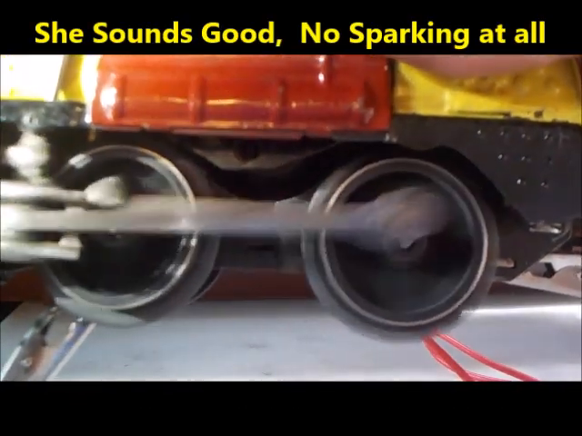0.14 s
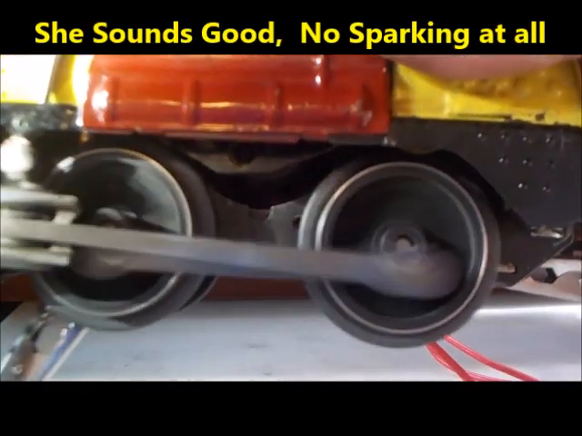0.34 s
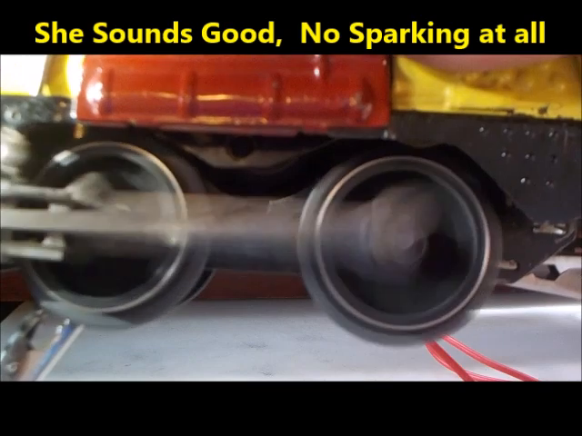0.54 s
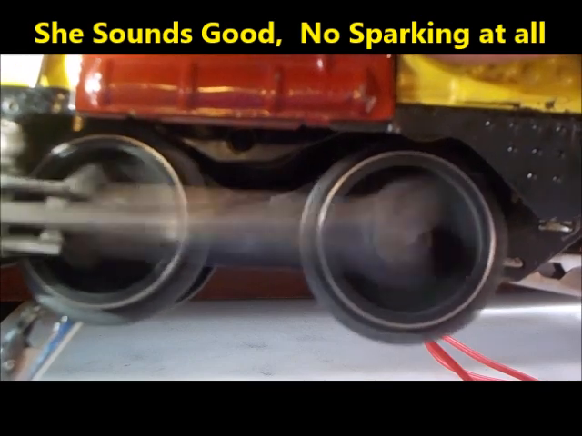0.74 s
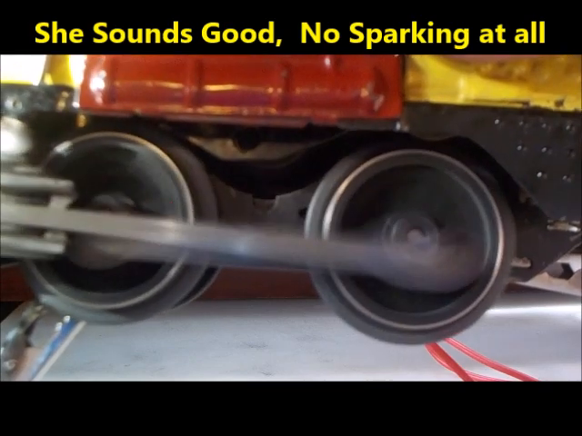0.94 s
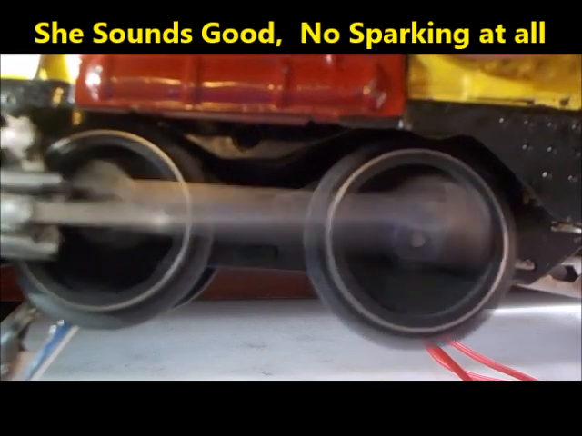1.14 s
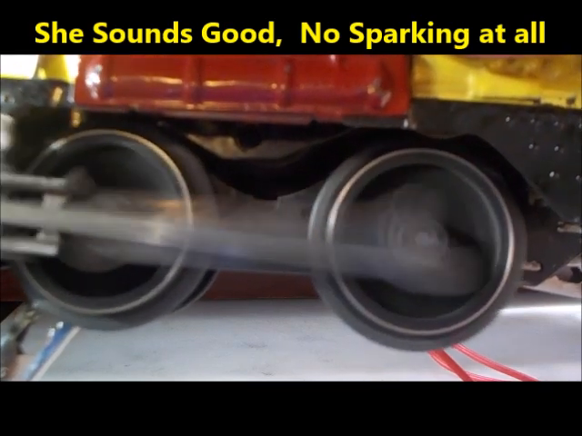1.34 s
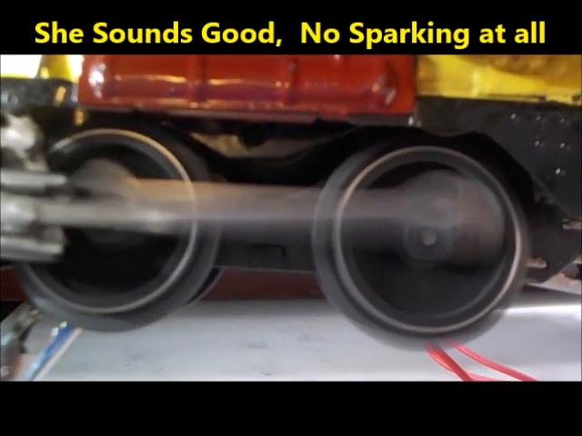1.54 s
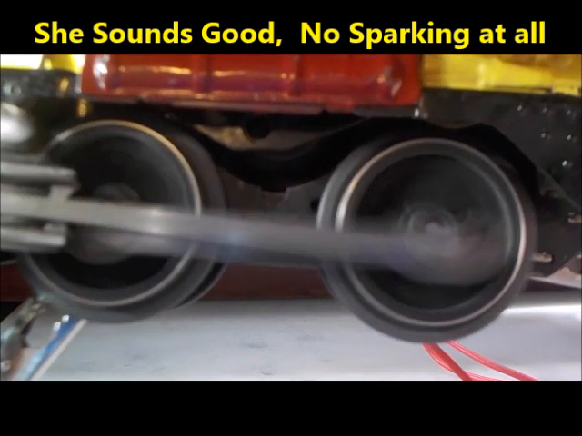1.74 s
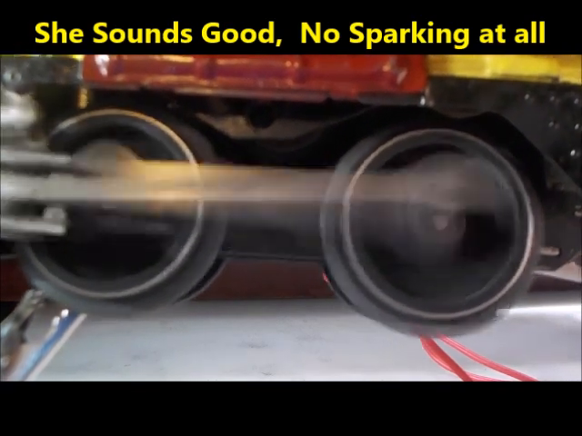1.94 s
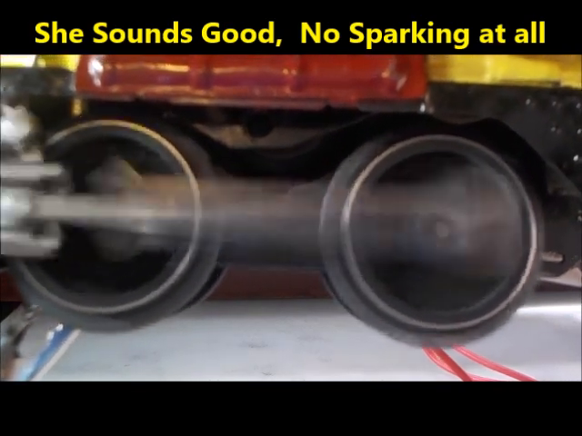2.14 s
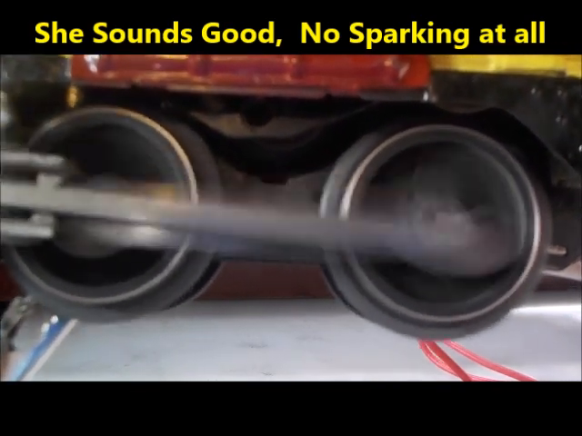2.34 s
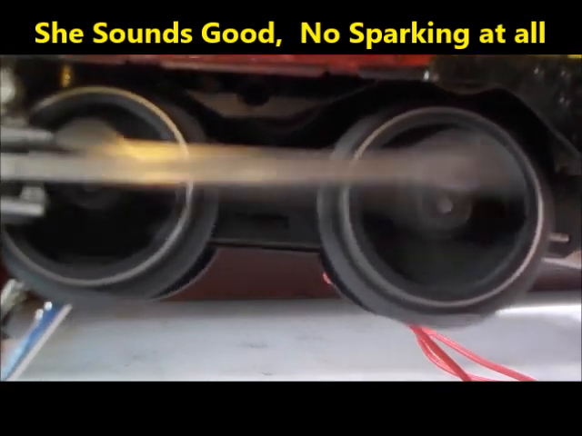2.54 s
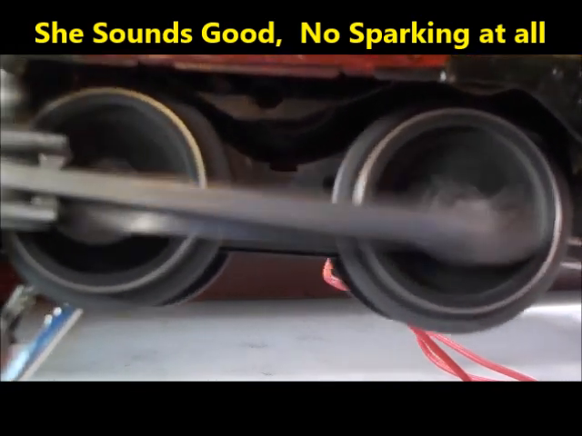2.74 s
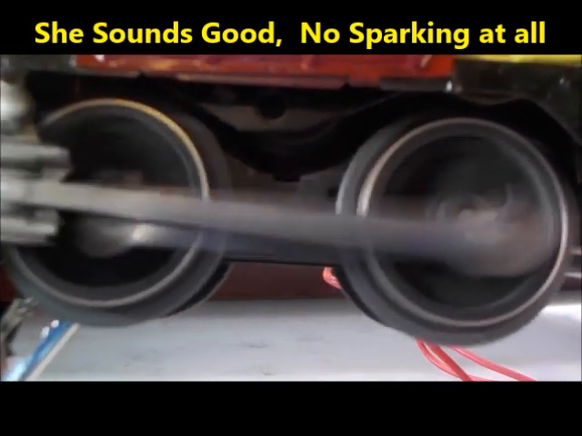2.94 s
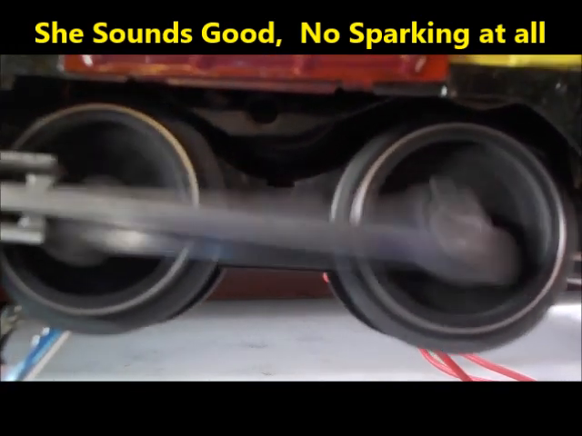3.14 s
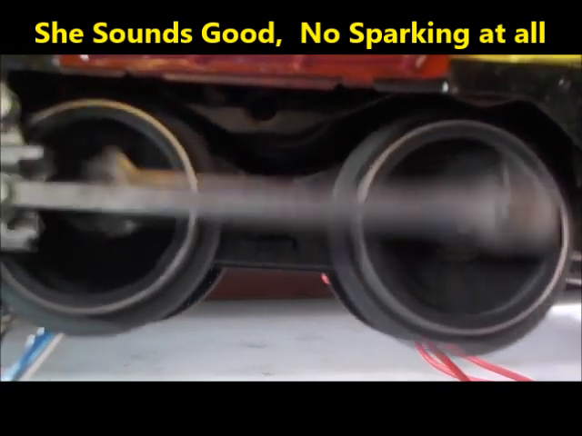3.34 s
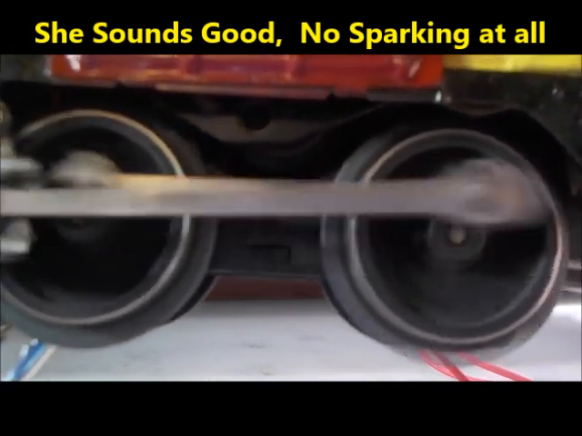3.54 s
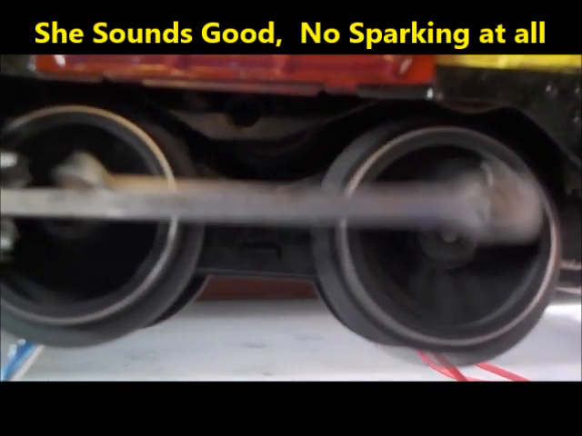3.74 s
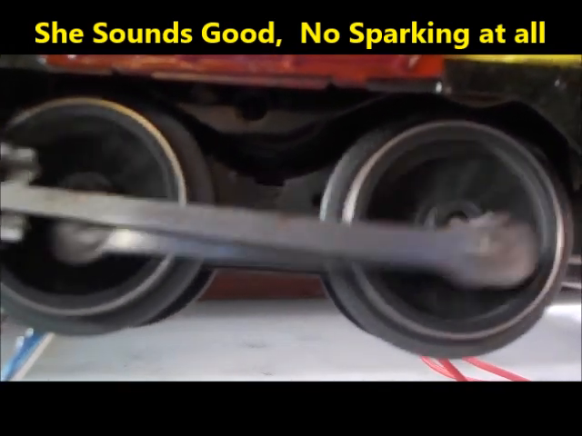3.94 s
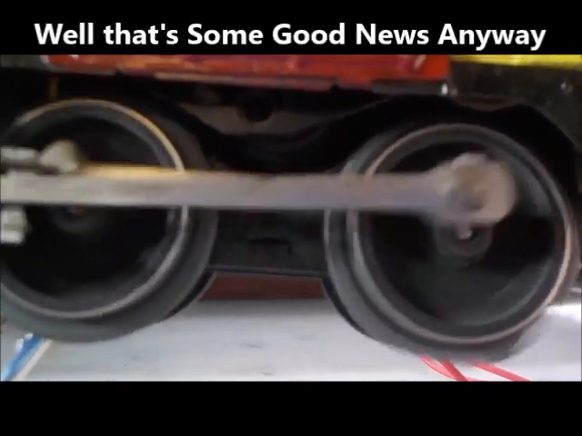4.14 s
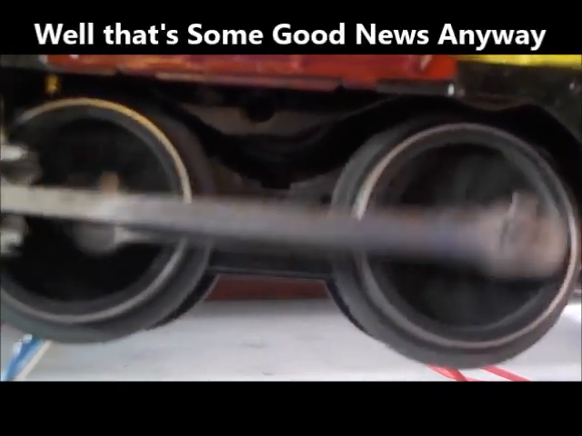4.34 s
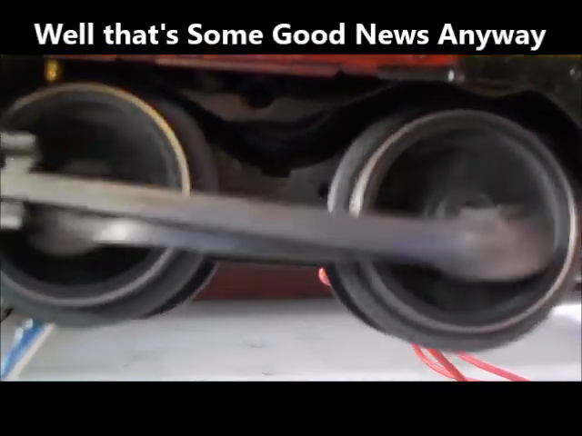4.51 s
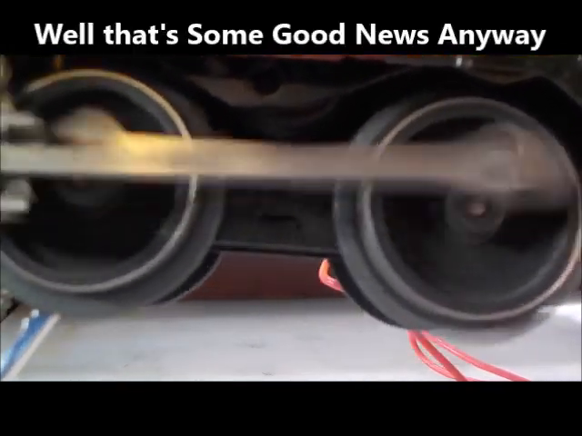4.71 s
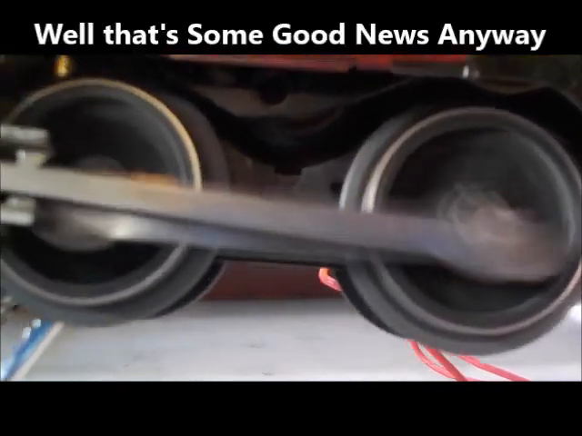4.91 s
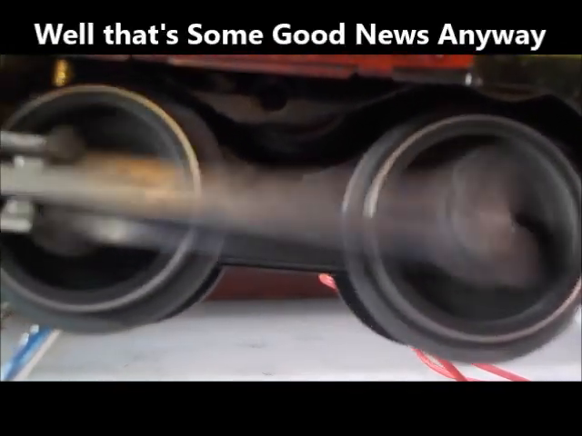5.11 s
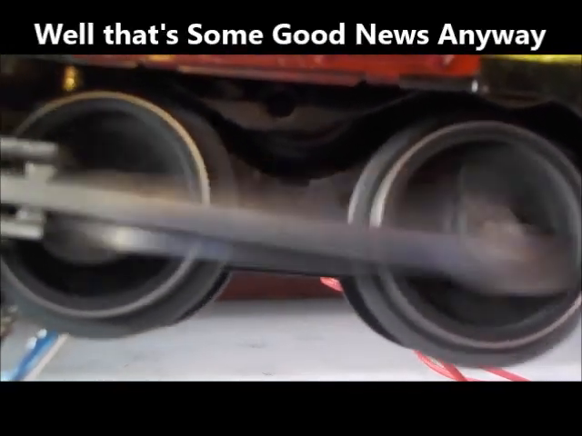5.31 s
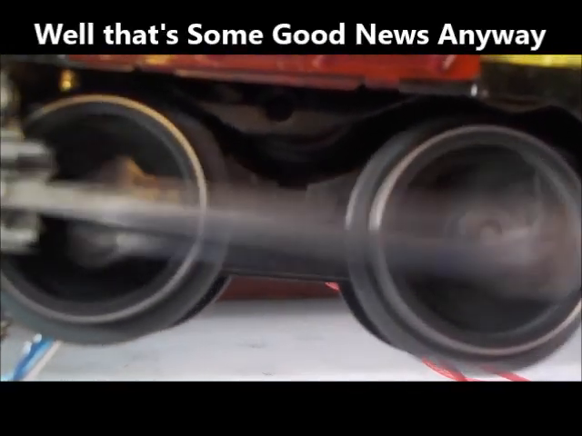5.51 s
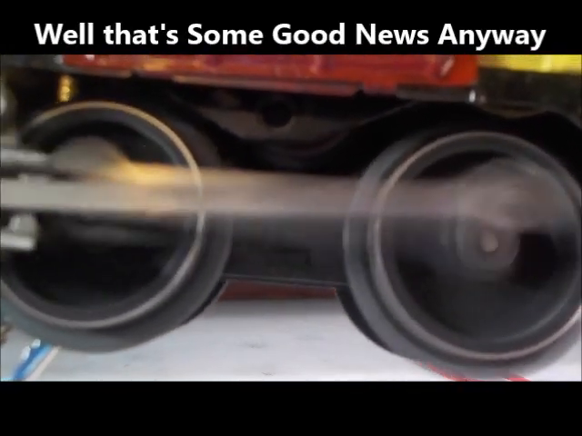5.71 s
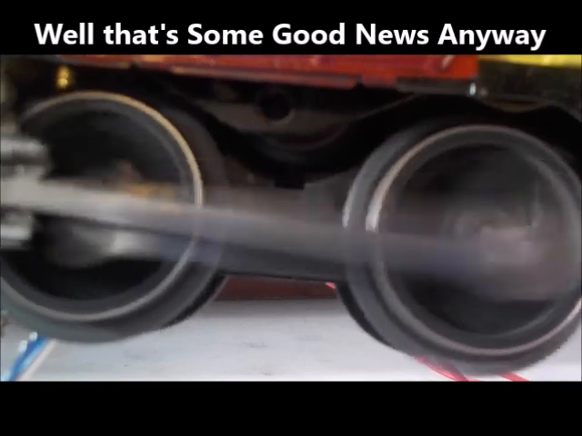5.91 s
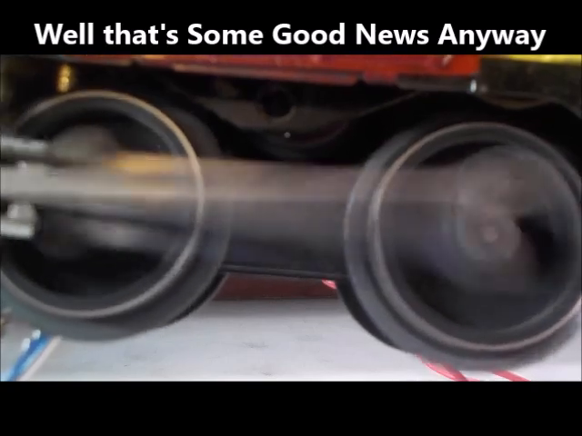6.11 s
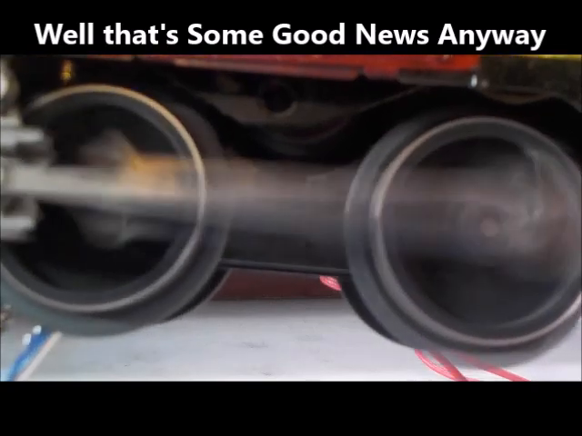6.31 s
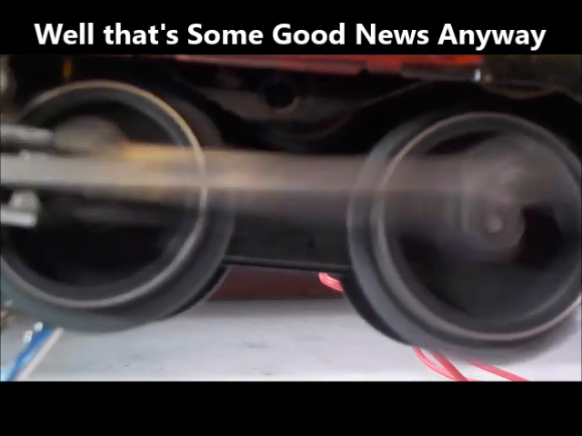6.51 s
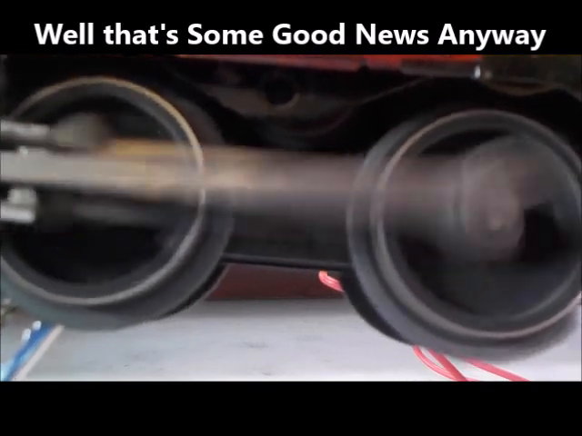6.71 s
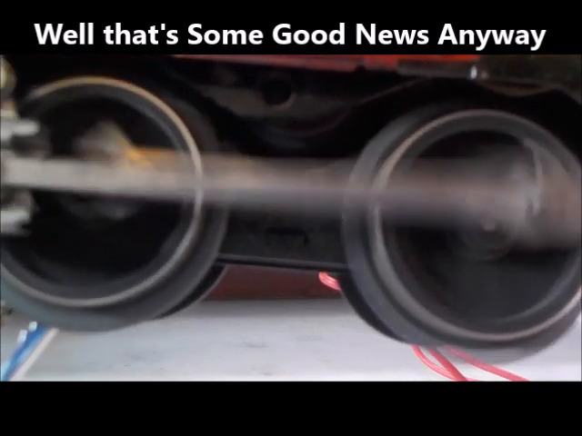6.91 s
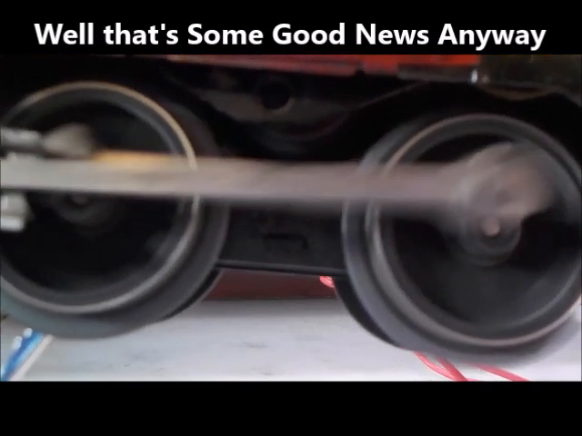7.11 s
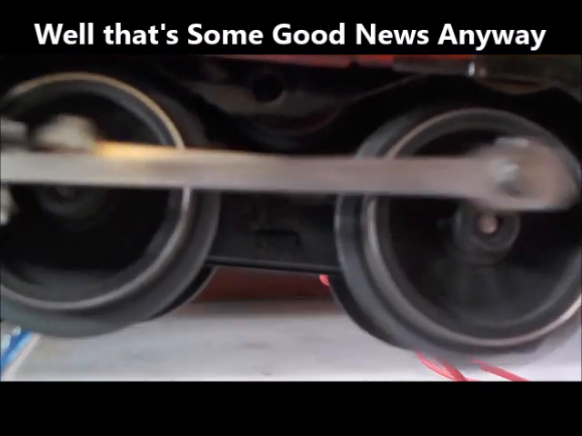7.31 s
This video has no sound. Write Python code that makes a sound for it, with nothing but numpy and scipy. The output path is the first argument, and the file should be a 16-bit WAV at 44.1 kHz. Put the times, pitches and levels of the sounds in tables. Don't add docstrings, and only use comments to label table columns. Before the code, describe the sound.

A small electric model locomotive runs wheels-free on a bench, picked up very close and dry in stereo, with little bass. It begins fairly quiet, its gritty gear chatter and separate rod clacks quickening over the first second into a loud, bright metallic whir. From about 1 to 2.6 seconds it races: side rods knock and clack about a dozen times a second, unevenly, over dense tooth chatter, a faint armature hum and thin rim ringing, with brittle overload cracks. From 2.6 it coasts down, the clacks spreading apart, until around 4.1 only a faint slow rattle remains. Power returns at about 4.3, and the whir climbs to full loudness by 5.5, again harsh and crackling until about 6.4. It then eases off, slack rods still clacking hard, slowing and quieter but still turning at the end, about 7.4 seconds.

```python
import sys
import numpy as np
from scipy import signal
from scipy.fft import rfft, irfft, next_fast_len
from scipy.io import wavfile
from scipy.ndimage import uniform_filter1d

SR = 44100
rng = np.random.default_rng(int(sys.argv[2]) if len(sys.argv) > 2 else 0)


def int16_out(signal):
    q = np.round(np.clip(np.atleast_2d(signal).T, -1, 1) * 32767)
    wavfile.write(sys.argv[1], SR, q.astype(np.int16))


def how_loud(loudness_db):
    steps = np.asarray(loudness_db, float) / 20
    return 10 ** steps


N = 324568
FULL_SPEED = 114
GEAR_RATIO, START_WHEEL_TURN = 8.5477, -1.488


def rms_one(x):
    return x / np.sqrt(np.mean(x ** 2) + 1e-20)


def in_time(rows):
    s, *columns = np.transpose(rows)
    return [np.interp(np.arange(N) / SR, s, c) for c in columns]


def at_hz(points, hz):
    table_hz, level_db = np.array(points)[:, 0], np.array(points)[:, 1]
    return np.interp(np.log(hz + 1), np.log(table_hz), level_db)


def colour(x, spectrum):
    closed = [(spectrum[0][0] / 2, -90)] + list(spectrum) + [(spectrum[-1][0] * 1.15, -90)]
    cepstrum = irfft(at_hz(closed, np.linspace(0, SR / 2, 2049)) * np.log(10) / 20)
    cepstrum[1:2048] *= 2
    cepstrum[2049:] = 0
    return signal.fftconvolve(x, irfft(np.exp(rfft(cepstrum))))[:N]


def band(x, order, hz, kind):
    return signal.sosfilt(signal.butter(order, hz, kind, fs=SR, output="sos"), x)


def drift(rate):
    r = np.exp(-2 * np.pi * rate / SR)
    return rms_one(signal.lfilter([1], [1, -2 * r, r * r], rng.standard_normal(N + SR))[SR:])


def ring(clicks, hz, t60):
    r, w = how_loud(-60 / (t60 * SR)), 2 * np.pi * hz / SR
    return signal.lfilter([0, np.sin(w)], [1, -2 * r * np.cos(w), r * r], clicks + 1e-18)


def strikes(seconds, heights):
    train = np.zeros(N)
    train[np.minimum(np.round(np.asarray(seconds) * SR).astype(int), N - 1)] = heights
    return train


def spread(excitation, spectrum, width):
    lean = width * drift(500)
    return rms_one(np.array([colour(excitation * (1 + side * lean), spectrum) for side in (1, -1)]))


# start_s, speed_turns_per_s
MOTOR_SPEED = [(0.0, 41.5), (0.57, 81.9), (0.913, 97.4), (1.287, 106.8), (1.715, 111.1), (2.329, 114.7),
               (2.564, 112.3), (3.13, 70.6), (3.617, 41.8), (3.946, 27.2), (4.138, 18.6), (4.42, 34.6),
               (4.577, 55.5), (5.442, 97.1), (5.814, 108.5), (6.308, 110.8), (6.753, 79.5), (7.36, 38.3)]


def motor_run():
    speed, = in_time(MOTOR_SPEED)
    start_turn = .114
    return speed, start_turn + np.cumsum(speed) / SR


def push(speed):
    return uniform_filter1d(np.gradient(np.log(speed)) * SR, size=SR // 5, mode="nearest")


# start_s, level_db
CHATTER = [(0, -35), (.45, -29.5), (.9, -25), (1.99, -24), (2.6, -24), (3.26, -30.5), (3.92, -40),
           (4.2, -43.5), (4.45, -33.5), (4.67, -29.5), (5.45, -24), (6.13, -24), (6.72, -26.5), (7.2, -35),
           (7.36, -37.5)]


def chatter_level():
    return in_time(CHATTER)[0]


def crank(contacts, speed, turns):
    angle, db, octave_db, loss_db, scatter = np.transpose(contacts)
    wheel = turns / GEAR_RATIO + START_WHEEL_TURN
    luck = rng.standard_normal((2, 70, len(contacts)))
    contact_turns = np.arange(-2, 68)[:, None] + angle + scatter * luck[0]
    at = np.interp(contact_turns, wheel, np.arange(N)).astype(int)
    level_db = chatter_level()[at] + db + octave_db * np.log2(speed[at] / FULL_SPEED)
    level_db -= loss_db * np.abs(luck[1])
    level_db -= 0.5 * np.minimum(push(speed)[at], 0)
    inside = (at > 0) & (at < N - 99)
    return at[inside] / SR, level_db[inside]


SEGMENTS = [
    0,
    -9,
    -7,
]


def brushes(turns):
    gap = np.floor(3 * turns).astype(int)
    crossed = np.diff(gap, prepend=gap[0]) > 0
    tick_db = np.array(SEGMENTS)[gap % 3] + rng.normal(0, 0.47, N)
    return rms_one(crossed * how_loud(tick_db) * rng.choice([-1, 1], N))


def teeth(per_s, spread_db, low_hz, high_hz, cycles, dry_db):
    sizes = how_loud(spread_db * np.minimum(rng.exponential(1, N), 3.3)) * rng.choice([-1, 1], N)
    clicks = sizes * (rng.random(N) < per_s / SR) / np.sqrt(per_s)
    dealt = rng.integers(0, 12, N)
    rings = 0
    for k, hz in enumerate(np.geomspace(low_hz, high_hz, 12)):
        rings = rings + rms_one(ring(clicks * (dealt == k), hz, cycles / hz)) * np.sqrt(hz)
    return rms_one(rings) + how_loud(dry_db) * rms_one(clicks)


# crank_angle_turns, hardest_db (against the whir),
# change_db (per doubling of speed), usual_loss_db, scatter_turns
KNOCKS = [
    (-.016, 3, -2.2, 4, .004),
    (.195, -2, 1.2, 4, .012),
    (.3, -3, -2.5, 4, .015),
]
# pitch_hz, level_db (per Hz)
RUMBLE = [(59, -71), (100, -52.5), (327, -35), (373, -40.5), (513, -28), (661, -13), (885, -3.5),
          (1110, -9.5), (1170, -5.5), (1320, -3.5), (1450, -4.5), (1630, -0.5), (1840, -9), (2100, -5.5),
          (2400, -18), (3120, -49), (5280, -120)]
# pitch_hz, level_db (per Hz)
WHIR = [(1410, -104), (2400, -40), (2720, -23.5), (3010, -24.5), (3360, -3.5), (3570, -1.5), (3930, -2),
        (4420, -5.5), (5940, -7.5), (6510, -13), (7160, -28.5), (8000, -45.5), (10400, -27), (17600, -120)]
# pitch_hz, level_db (per Hz)
FIZZ = [(4710, -30), (8000, -7.5), (8320, -6.5), (8600, -8.5), (9620, -8.5), (12500, -15), (16200, -75),
        (22000, -120)]


def gears(speed, turns):
    knock_s, _ = crank(KNOCKS[:1], speed, turns)
    fade = np.exp(-1 / (0.006 * SR))
    shaken_db = 3.0 * signal.lfilter([1], [1, -fade], strikes(knock_s, 0.64))
    beat_db = 0.86 * np.cos(2 * np.pi * turns) + 0.75 * drift(67) + 1.38 * drift(26.6)
    wheel = turns / GEAR_RATIO + START_WHEEL_TURN
    load_db = 0.5 * np.cos(2 * np.pi * (wheel - 0.25))

    octaves = np.log2(speed / FULL_SPEED)
    rumble_db = -19.5 + 1.3 * push(speed) - 0.8 * octaves
    fizz_db = -27.5 + 1.1 * octaves

    ticks = brushes(turns) * (50 / speed) ** .9
    bright = teeth(36 * speed + 900, 3.2, 2700, 7250, cycles=33.4, dry_db=0.5)
    bright = rms_one(bright) + .62 * ticks
    dull = teeth(16 * speed + 300, 1.0, 371, 2227, cycles=14.3, dry_db=-24) + 0.76 * bright
    fine = teeth(40 * speed + 900, 1.5, 9250, 8600, cycles=21, dry_db=-1) + 0.37 * bright
    fine = rms_one(fine) + 1.6 * ticks

    dull = dull * how_loud(0.74 * beat_db + shaken_db + load_db)
    fine = fine * how_loud(1.67 * beat_db + shaken_db)
    dull = dull + how_loud(-36) * ring(dull, 1483, .03)
    whir = spread(bright * how_loud(beat_db + shaken_db), WHIR, width=.2)
    rumble = spread(dull, RUMBLE, width=0.11)
    fizz = spread(fine, FIZZ, width=1.0)
    layers = whir + how_loud(rumble_db + 2.5) * rumble + how_loud(fizz_db + 5.0) * fizz
    return how_loud(chatter_level() + 0.54) * layers


# multiple_of_speed, level_db (at full speed)
HUM = [
    (3, -54),
    (4, -60),
    (6, -58.5),
    (9, -61),
    (12, -60),
]
# pitch_hz, level_db
BENCH_TOP = [(170, -46), (250, -30), (350, -29), (510, -18), (590, 0), (800, 0), (1030, 1), (1350, -14)]


def armature(speed, turns):
    coast_s = 1.0
    drive = np.clip(speed * (1 + coast_s * push(speed)) / FULL_SPEED, .01, 1)
    current_db = 20 * np.log10(drive) + 11 * np.minimum(np.log2(speed / 90), 0)
    hum = np.zeros(N)
    for k, db in HUM:
        line_db = db + at_hz(BENCH_TOP, k * speed) + current_db + 27 / k ** 2 * drift(5)
        hum += np.sqrt(2) * how_loud(line_db) * np.sin(2 * np.pi * k * turns)
    return hum


def room_tone():
    mid, side = rng.standard_normal((2, N))
    noise = np.array([mid + 0.12 * side, mid - 1.1 * side])
    hiss = band(noise, 2, 10500, "high") * how_loud(2.2 * drift(25))
    rumble = band(noise, 4, [430, 1100], "band") * how_loud(2 * drift(8))
    deep = band(noise, 3, [130, 330], "band")
    hum = band(mid, 2, [30, 48], "band")
    return how_loud(-66.5) * hiss + how_loud(-52.5) * rumble + how_loud(-73.0) * deep + how_loud(-81) * hum


# pitch_hz, level_db, fade_s (to fall 60 dB)
FRAME = [
    (1483, 0, .055),
    (1605, -5, .04),
    (1190, -8, .04),
    (935, -13, .04),
]


def rod_knocks(speed, turns):
    s, db = crank(KNOCKS, speed, turns)
    luck_db = rng.normal(0, 0.76, (len(s), len(FRAME)))
    knocks = np.zeros(N)
    for k, (hz, mode_db, t60) in enumerate(FRAME):
        strike_db = db + mode_db - 6.5 + luck_db[:, k] * (k > 0)
        knocks += ring(strikes(s + 0.001017, how_loud(strike_db)), hz, t60)
    return band(knocks, 4, 450, "high")


# crank_angle_turns, hardest_db (against the whir),
# change_db (per doubling of speed), usual_loss_db, scatter_turns
SLACK = [
    (0.001, 16, 0.11, 1.7, .006),
    (0.202, 18, .1, 2, .03),
    (.46, 7.4, .1, 6.4, .04),
    (.62, 13, .1, 18, .05),
    (.82, 19.7, .1, 5.5, 0.03),
]
# start_s, peak_db, brightest_pitch_hz
CLACKS = [(0.097, -15, 4330), (0.6289, -10, 3680), (0.7103, -11, 3800), (0.8734, -10, 3870),
          (0.9741, -8, 3800), (1.1331, -9.5, 3400), (1.285, -9, 3920), (1.3955, -9, 3780),
          (1.4224, -10, 3420), (1.6257, -7, 3600), (1.932, -5, 3440), (2.0827, -6, 3800),
          (2.3087, -21, 3780), (2.8508, -8, 3530), (3.1621, -10, 3860), (3.1996, -7.5, 3500),
          (3.8035, -22, 3930), (4.374, -17, 5400), (5.1415, -7.5, 3970), (5.4379, -5, 3560),
          (5.8436, -9, 6100), (5.9369, -20, 5140), (6.0928, -2, 3750), (6.3848, -10, 4800),
          (6.4813, -5, 3220), (6.5824, -3.5, 4200), (6.6643, -4.5, 3820), (6.785, -8, 3600),
          (6.8839, -11.5, 4550), (7.012, -4, 4050)]


def rod_clacks(speed, turns):
    slack_s, slack_db = crank(SLACK, speed, turns)
    slack_hz = 3530 + 347 * rng.exponential(1, len(slack_s))
    free = np.abs(slack_s[:, None] - np.array(CLACKS)[:, 0]).min(axis=1) > .012
    clacks = [(s, db + 1.5, hz) for s, db, hz in CLACKS]
    clacks += list(zip(slack_s[free], slack_db[free], slack_hz[free]))
    t, out = np.arange(600) / SR, np.zeros(N + 600)
    rattle = rng.standard_normal((len(clacks), 600))
    shape = (1 - np.exp(-t / 2e-4)) * (np.exp(-t / .0013) + .15 * np.exp(-t / .005))
    for (s, db, hz), noise in zip(clacks, rattle):
        burst = shape * (0.29 * np.sin(2 * np.pi * hz * t) + noise)
        out[round(s * SR):][:600] += how_loud(db + 10.5) * burst / np.max(np.abs(burst))
    return colour(out[:N], [(hz, 0.83 * db) for hz, db in WHIR])


# crank_angle_turns, hardest_db (against the whir),
# change_db (per doubling of speed), usual_loss_db, scatter_turns
RIM = [
    (0.001, -39.5, 0.23, 5, .01),
    (.56, -20, -1.6, 4.5, 0.018),
    (.7, -24, .1, 8.1, 0.054),
    (.83, -17.5, .1, 11, 0.037),
]


def wheel_rim(speed, turns):
    s, db = crank(RIM, speed, turns)
    rings = ring(strikes(s, how_loud(db + 3.5)), 9880, .05)
    return band(rings, 2, [9300, 10500], "band")


# pitch_hz, left_minus_right_db
LEANING = [(150, 15), (380, 2), (700, -4.5), (1300, -2), (2400, -0.5), (4400, 0), (8100, 2), (15000, 1.5)]
# pitch_hz, reflected_minus_direct_db
DIFFUSE = [(150, 57), (500, -6.5), (1500, -10.5), (4000, -8.5), (7000, -24), (10000, -6.5), (15000, 21)]


def bench(x):
    left_lead_s, tail_t60_s = 2.5e-5, .13
    size = next_fast_len(N + SR // 4)
    hz, t = np.linspace(0, SR / 2, size // 2 + 1), np.arange(SR // 5) / SR
    tails = rng.standard_normal((2, len(t))) * how_loud(-60 * t / tail_t60_s) * (t > .001)
    tails = rfft(tails / np.sqrt(np.sum(tails ** 2, axis=1, keepdims=True)), size)
    side = np.array([[.5], [-.5]])
    direct = np.exp(2j * np.pi * hz * left_lead_s * side)
    wet = how_loud(at_hz(DIFFUSE, hz))
    path = how_loud(side * at_hz(LEANING, hz)) * (direct + wet * tails) / np.sqrt(1 + wet ** 2)
    return irfft(rfft(x, size) * path, size)[:, :N]


# start_s, peak_db, thump_db, left_minus_right_db
CRACKS = [(0.8734, -33, -74, 4.0), (0.9752, -41, -64, -1.5), (1.0156, -36, -69, 4.0), (1.2855, -22, -47, 2),
          (1.3947, -38, -67, -1.0), (1.4696, -32, -48, -2.0), (1.5359, -34, -58, -2.5),
          (1.5813, -31, -69, 4.0), (1.6916, -33, -65, 4), (1.9131, -37, -73, -6), (2.0388, -39, -70, 6.0),
          (2.159, -36, -54, 5.0), (2.3092, -26, -53, -0.5), (2.3999, -40, -59, -4.0),
          (2.6115, -33, -48, 2.0), (2.7766, -31, -88, 2.5), (5.6067, -35, -78, -1.5),
          (5.7009, -32.5, -53, -4), (5.7813, -36, -62, 11), (5.8456, -22, -58, -1), (5.9369, -27, -63, 7),
          (6.0342, -41, -68, 15.5), (6.0911, -36, -69, -1.5), (6.1739, -27, -49, 3),
          (6.2731, -39, -67, 8.0), (6.3275, -24, -46, -0.5), (6.4822, -37, -71, -2.0),
          (6.7855, -38, -56, 0.5)]


def overload():
    s, db, thump_db, pan_db = np.transpose(CRACKS)
    slip_s = rng.uniform(-4e-5, 4e-5, len(s))
    ticks = np.array([strikes(s + 3e-4 + side * slip_s, how_loud(db + 21.0 + side * pan_db / 2))
                      for side in (1, -1)])
    thump = strikes(s + 0.0013, how_loud(thump_db + 26.5))
    return band(ticks, 2, 10000, "high") + band(thump, 3, [150, 480], "band")


# pitch_hz, width_hz
NOTCHES = [
    (2355, 505),
    (2510, 34),
    (8080, 400),
    (7840, 210),
]


def limit_and_notch(x):
    x = x / (1 + (x / .52) ** 6) ** (1 / 6)
    for hz, width_hz in NOTCHES:
        x = signal.lfilter(*signal.iirnotch(hz, hz / width_hz, fs=SR), x)
    return band(x, 4, 170, "high")


def scene():
    speed, turns = motor_run()
    clatter = gears(speed, turns) + rod_knocks(speed, turns)
    clatter = clatter + rod_clacks(speed, turns) + wheel_rim(speed, turns)
    hum = armature(speed, turns) * how_loud(np.array([[-1.5], [1.5]]))
    return bench(clatter) + hum


def band_limit(x):
    return signal.sosfilt(signal.butter(12, 15940, fs=SR, output="sos"), x)


def record(dry):
    wide = limit_and_notch(dry) + overload() + room_tone()
    wide = signal.sosfilt(signal.cheby2(12, 45, 16050, fs=SR, output="sos"), wide)
    return band_limit(wide)


dry = scene()
out = record(dry)
int16_out(out)
```